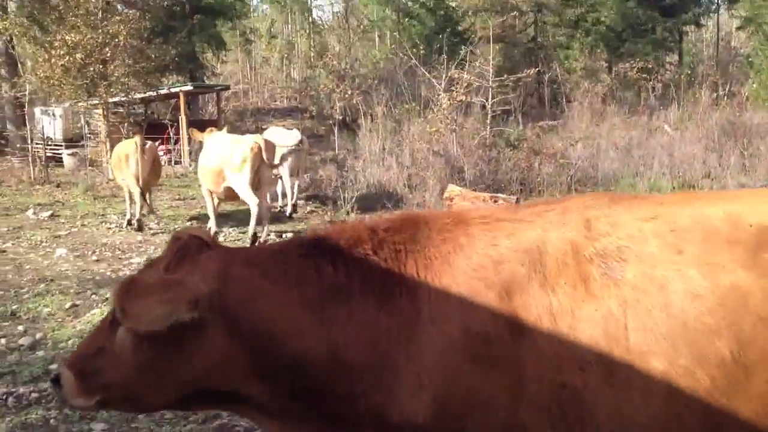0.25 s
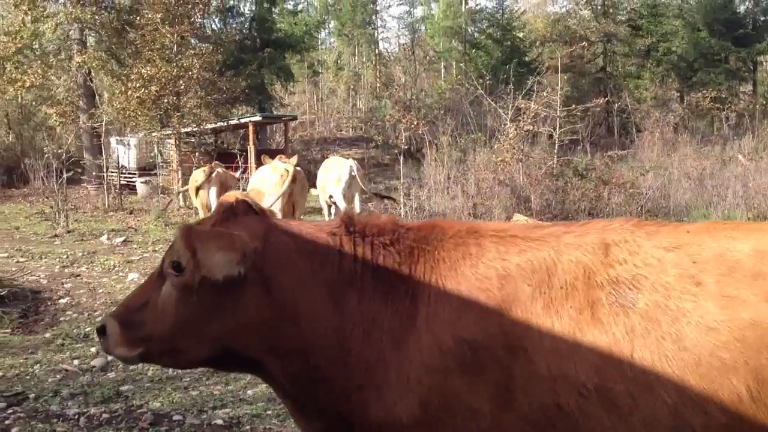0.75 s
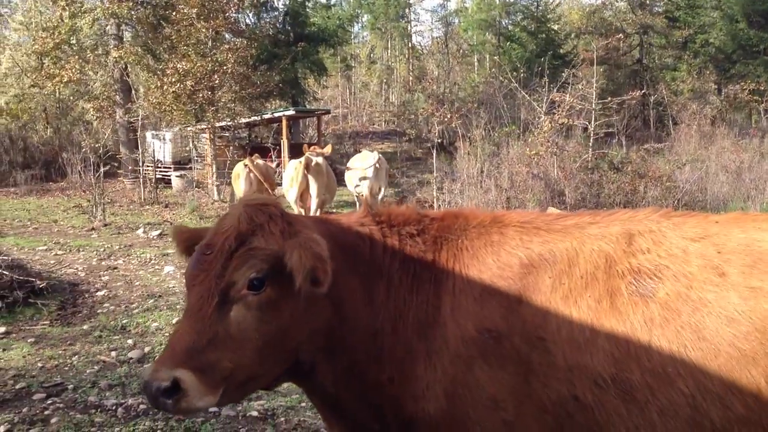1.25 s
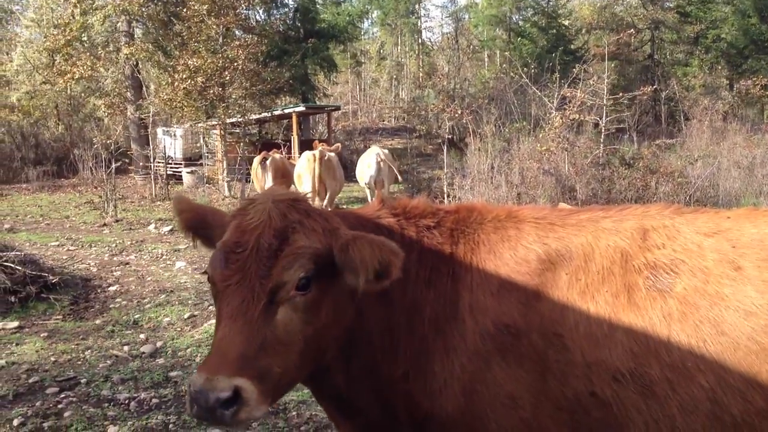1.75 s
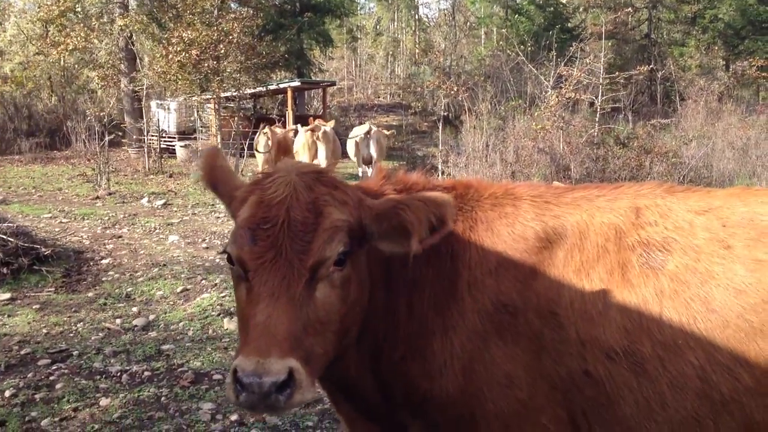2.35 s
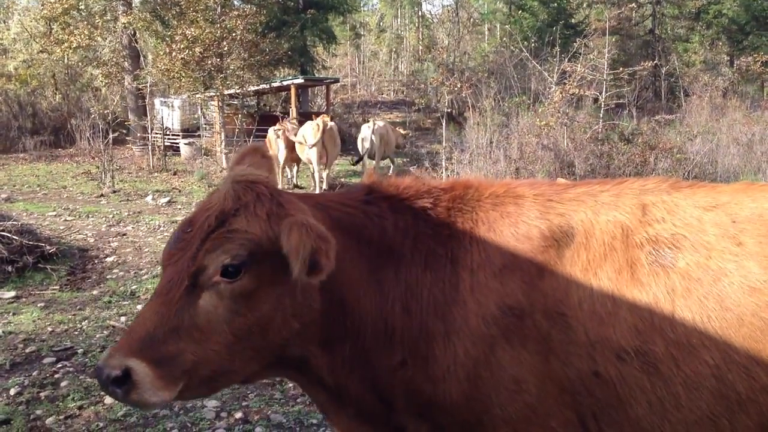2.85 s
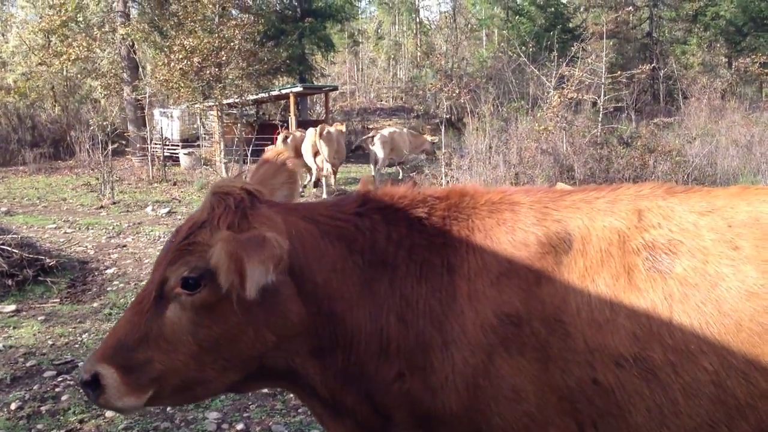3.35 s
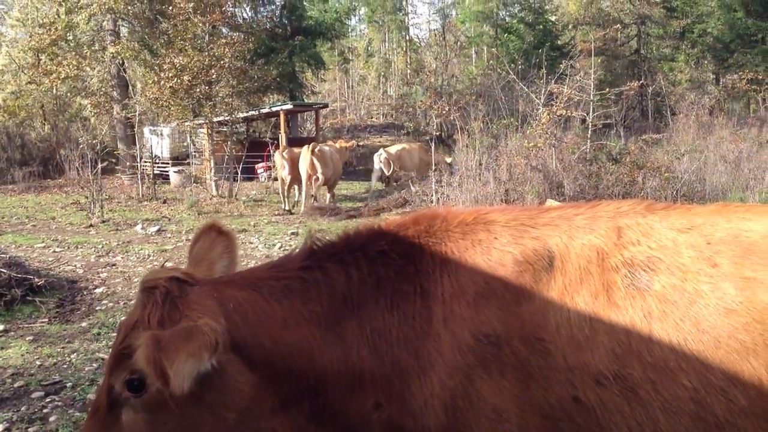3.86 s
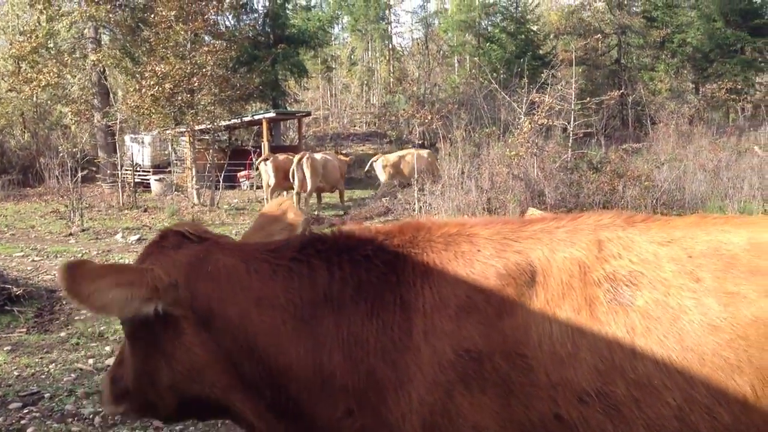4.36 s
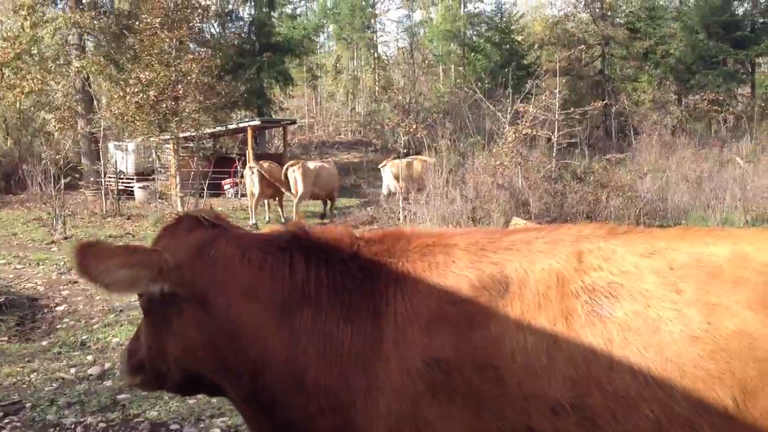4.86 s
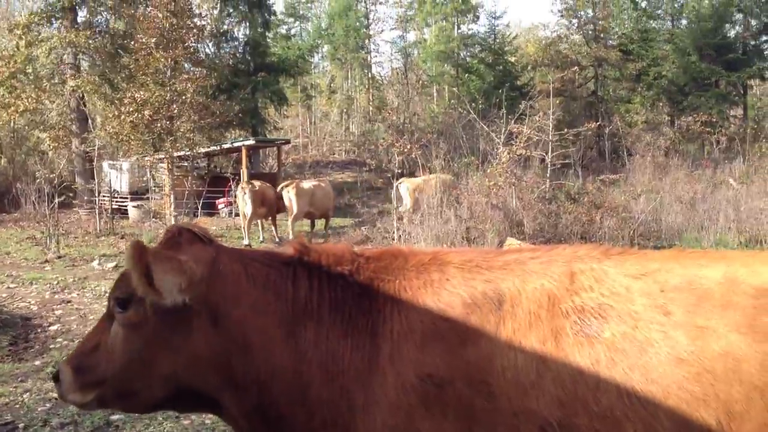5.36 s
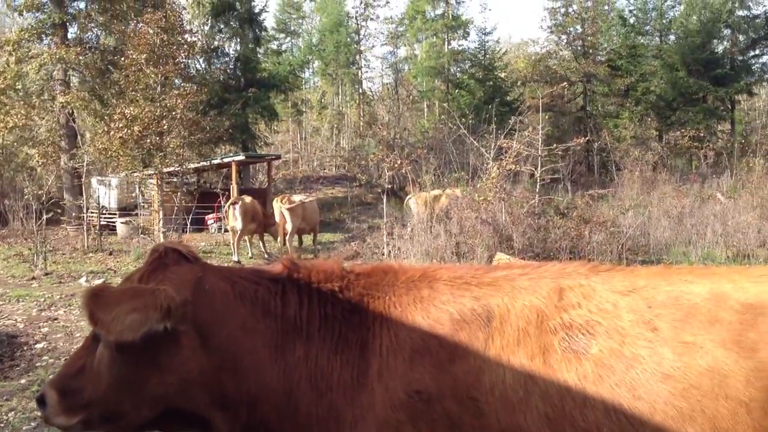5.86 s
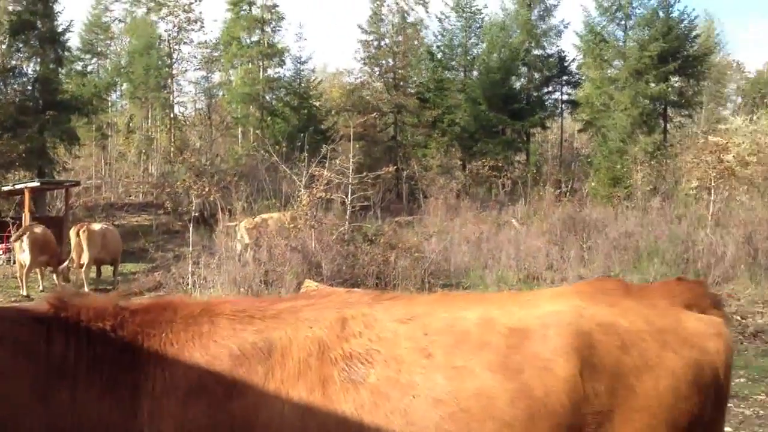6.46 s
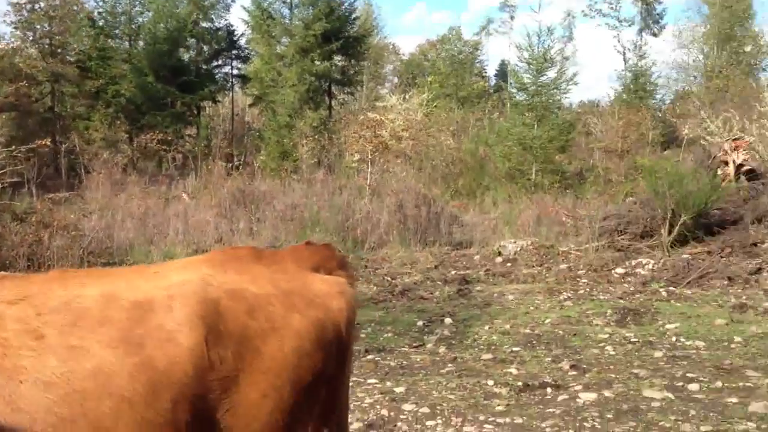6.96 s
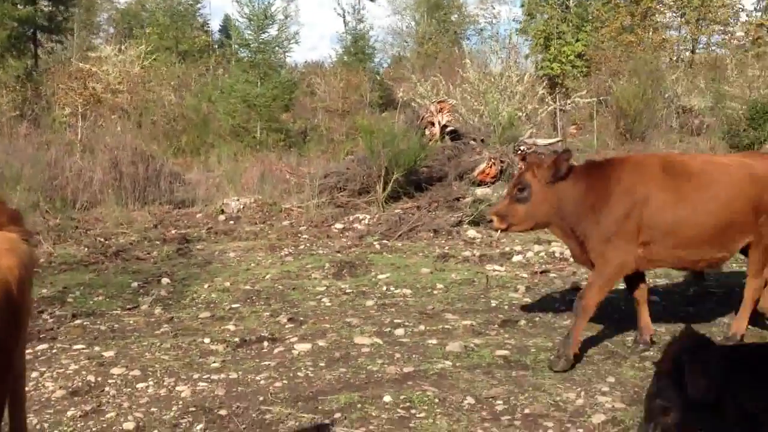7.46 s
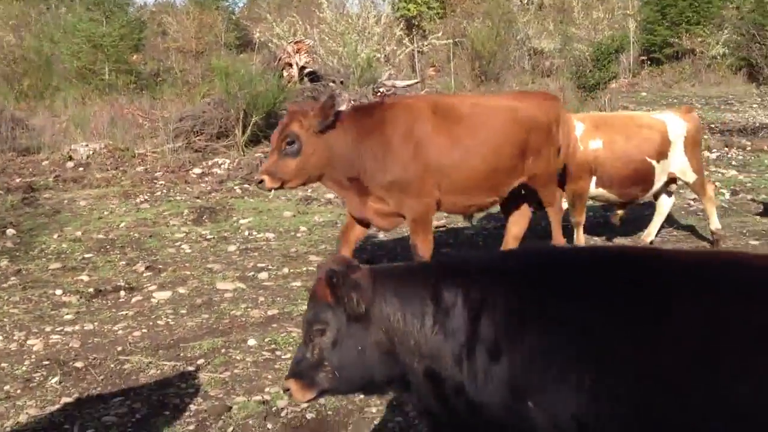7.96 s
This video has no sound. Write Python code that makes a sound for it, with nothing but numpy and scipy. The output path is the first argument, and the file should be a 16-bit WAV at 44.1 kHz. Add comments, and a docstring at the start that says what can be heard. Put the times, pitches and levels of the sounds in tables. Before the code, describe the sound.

A close, dry outdoor pasture with very quiet air. From 0 s, soft straw scuffs and small stalk snaps, a light hollow wood knock at 0.3, and short low fluttering grunts at about 0.1, 0.9, 1.4 and 1.9 s, each around a tenth of a second. At 2.0 s a loud hollow wooden bang with a sharp crack is the strongest event. From 2.5 to 4.3 s, crisp snaps and crunching straw crowd together, with weak knocks; a faint wavering hum sits behind from 2.1 to 3.8. Grunts return at 3.7 and 4.1, then 4.7, a stronger one at 4.85, and 5.1, 5.5, 6.0 and a faint 6.4. Clear wood knocks fall at 4.6 and 5.2. Hissing scuffs continue, with tiny thin pings between 5.6 and 6.9. The rustle turns duller near 7; a last low grunt comes at 7.3, then light snaps and scuffs until 8 s.

```python
"""Straw scuffs and a snapping stalk come first, then close pigs' short fluttering grunts as they root about.
Grunts: fold pulses chopped by a flapping palate, through chest, snout and nose resonances.
Straw: shaped noise and clumped cracks, with a gain curve per layer; snaps: short resonated noise bursts.
Hollow wood is knocked now and then: a blow and rattle excite decaying modes, a noisy tail fills in between.
Behind: quiet open air as shaped noise, and for a while a faint wavering sine hum."""
import sys
import numpy as np
from scipy import signal
from scipy.fft import rfft, irfft
from scipy.io import wavfile
from scipy.ndimage import uniform_filter1d

SR = 44100
rng = np.random.default_rng(int(sys.argv[2]) if len(sys.argv) > 2 else 0)


def generate_wav(sig):
    """Save sig (samples, or channels by samples) to the path in sys.argv[1] as 16-bit PCM at SR."""
    pcm = np.round(np.clip(np.atleast_2d(sig).T, -1, 1) * 32767).astype(np.int16)
    wavfile.write(sys.argv[1], SR, pcm)


N = 362061


def gain_of(db):
    """Decibels to gain."""
    return 10 ** (np.asarray(db) / 20)


def evened(x):
    """Scales to rms 1."""
    return x / np.sqrt(np.mean(x ** 2) + 1e-20)


def typical(x):
    """Scales so that the median short-time rms, between the cracks, is 1."""
    return x / np.sqrt(np.median(uniform_filter1d(x ** 2, size=200)))


def add(mix, start_s, sound):
    """Mixes a sound in at start_s."""
    part = mix[round(start_s * SR):][:len(sound)]
    part += sound[:len(part)]


def high_passed(x, order, cutoff_hz):
    """Butterworth high-pass."""
    return signal.sosfilt(signal.butter(order, cutoff_hz, "high", fs=SR, output="sos"), x)


def resonate(x, hz, width_hz):
    """Shifts hz down to zero, smooths, and shifts back: a resonance of gain 1."""
    turn = np.exp(2j * np.pi * np.cumsum(hz * np.ones(len(x))) / SR)
    r = np.exp(-np.pi * width_hz / SR)
    return 2 * (turn * signal.lfilter([1 - r], [1, -r], x / turn)).real


def resonate_twice(x, hz, width_hz):
    """Two resonances in series, the second twice as wide."""
    return resonate(resonate(x, hz, width_hz), hz, 2 * width_hz)


def coloured(x, points):
    """Filters x by the (hz, db) points, then scales to rms 1."""
    point_hz, point_db = np.transpose(points)
    hz = np.fft.rfftfreq(len(x), 1 / SR)
    db = np.interp(np.log(hz + 1), np.log(point_hz), point_db)
    return evened(irfft(rfft(x) * gain_of(db), len(x)))


def drift(per_s, size=N):
    """Slow random curve of rms 1."""
    hz = np.fft.rfftfreq(size, 1 / SR)
    spectrum = rfft(rng.standard_normal(size)) * (hz > 0) / (1 + (hz / per_s) ** 2)
    return evened(irfft(spectrum, size))


def curve(rows):
    """Joins the rows of a table over the whole time."""
    s, *columns = np.transpose(rows)
    return [np.interp(np.arange(N) / SR, s, c) for c in columns]


# air spectrum: freq_hz, relative_db
AIR_SPECTRUM = [(29, -41.5), (50, 9), (113, -13), (137, 3), (191, -6), (226, 0.5), (249, -16), (733, -23),
                (2010, -30), (10200, -26.5), (12700, -32), (15400, -28)]
AIR_LEVEL_DB = -61.5
# hum: time_s, pitch_hz, level_db
HUM_PATH = [(2.1, 226, -87), (2.4, 220.5, -60.5), (3.5, 224, -59.5), (3.8, 222, -78)]


def air():
    """Shaped noise for open air, plus a sine hum wavering in pitch."""
    hz, db = curve(HUM_PATH)
    hum = gain_of(db) * np.sin(2 * np.pi * np.cumsum(hz * (1 + 0.01 * drift(2.5))) / SR)
    noise = rng.standard_normal(N) * gain_of(0.64 * drift(6.4))
    return gain_of(AIR_LEVEL_DB) * coloured(noise, AIR_SPECTRUM) + hum


def crackle(per_s, spread_db, bed, clump_db):
    """Clumped tiny cracks of random size over a bed of rubbing noise."""
    size_db = spread_db * np.minimum(rng.exponential(1, N), 3.8)
    cracks = (rng.random(N) < per_s / SR) * gain_of(size_db)
    decay_s = 0.0022
    burst = signal.lfilter([1], [1, -np.exp(-1 / (decay_s * SR))], cracks)
    return rng.standard_normal(N) * (bed + evened(burst)) * gain_of(clump_db * drift(8.8))


# scuffs: peak_s, rise_s, fall_s (each per 20 dB), hiss_db, crunch_db, shove_db
SCUFF_EVENTS = [(.075, 0.4, 0.24, -50.5, -52.5, -70.5), (.334, 0.15, 0.222, -57, -76, -41),
                (.723, 0.23, 0.47, -57.5, -53.5, -49.5), (1.048, 0.26, 0.2, -57, -49.5, -46),
                (1.3, 0.098, 0.49, -64.5, -59.5, -74), (1.921, 0.15, 0.17, -54.5, -49.5, -44),
                (1.985, 0.016, 0.19, -46.5, -46, -28), (2.479, 0.0067, 0.053, -37, -42.5, -66),
                (2.588, 0.085, 0.26, -42, -38, -42.5), (2.908, 0.62, 0.12, -49, -47.5, -57),
                (3.039, 0.03, 0.18, -46, -41.5, -49), (3.352, 0.0147, 0.078, -42.5, -38.5, -52),
                (3.442, 0.0275, 0.41, -54, -48.5, -74), (3.707, 0.58, 0.16, -46, -50.5, -58),
                (3.811, 0.12, 0.21, -50.5, -44.5, -39), (4.025, 0.079, 0.15, -40, -46.5, -69),
                (4.216, 0.27, 0.25, -53.5, -45, -46.5), (4.291, 0.061, 0.57, -39, -40.5, -40),
                (4.854, 0.073, 0.071, -43, -49, -36), (5.044, 0.19, 0.11, -39, -44, -38.5),
                (5.248, 0.15, 0.29, -38, -47.5, -36.5), (5.483, 0.14, 0.21, -42, -57, -55.5),
                (5.637, 0.043, 0.36, -41.5, -43.5, -57), (5.867, 0.12, 0.119, -41.5, -39, -45.5),
                (5.96, 0.061, 0.057, -43.5, -45, -53.5), (6.11, 0.55, 0.073, -53, -47.5, -47.5),
                (6.306, 0.3, 0.23, -44, -44, -45), (6.51, 0.11, 0.116, -45, -48.5, -48.5),
                (6.715, 0.13, 0.11, -44.5, -52.5, -52), (7.119, 0.28, 1, -49.5, -49.5, -55.5),
                (7.418, 0.081, 0.146, -50, -49.5, -52), (7.518, 0.056, 0.069, -47, -49, -48.5),
                (7.712, 0.21, 0.14, -51, -51, -65.5), (7.827, 0.065, 0.083, -43, -43, -70),
                (7.988, 0.26, 0.43, -40, -42.5, -50.5)]
# rustle of the herd between scuffs: time_s, hiss_db, crunch_db, shove_db
RUSTLE_LEVELS = [(0, -78, -56.5, -49.5), (.6, -77, -59, -64.5), (1.2, -70, -69.5, -65),
                 (1.7, -73.5, -63, -63.5), (2.3, -79, -71.5, -58.5), (3.3, -70, -64, -68),
                 (4, -56, -72, -73), (5.2, -71, -52, -55), (6.6, -56, -55, -55), (7.3, -53, -59.5, -61),
                 (8.2, -63, -72, -53.5)]


def scuffing(column, lag_s=0, stretch=1):
    """Gain curve of one straw layer: background rustle plus a rise and fall per scuff, summed as power."""
    t = np.arange(N) / SR - lag_s
    power = gain_of(2 * curve(RUSTLE_LEVELS)[column])
    for peak_s, rise_s, fall_s, *levels_db in SCUFF_EVENTS:
        span_s = [peak_s - 2 * stretch * rise_s, peak_s + 2 * stretch * fall_s]
        near = slice(*np.searchsorted(t, span_s))
        slope = np.maximum((peak_s - t[near]) / rise_s, (t[near] - peak_s) / fall_s) / stretch
        power[near] += gain_of(2 * (levels_db[column] - 20 * slope))
    return np.sqrt(power)


# straw layer spectra: freq_hz, relative_db
HISS_SPECTRUM = [(2000, -44), (4500, -6), (5600, -1.5), (9000, -1), (13000, 2.2), (15400, 1),
                 (16500, -56.5)]
CRUNCH_SPECTRUM = [(300, -5.5), (600, 0.5), (1100, 3.5), (2200, 1), (4650, -0.5), (5200, -12.5),
                   (9000, -15)]
SHOVE_SPECTRUM = [(40, -48), (105, -12.5), (170, -1), (260, -0.6), (600, -7), (1200, -29.5), (2500, -76)]
DULLS_S, DULL_HZ = 6.75, 5070  # start of the fade to duller hiss; its low-pass cutoff
SHOVE_LAG_S = 0.011  # the body's push follows the feet
SHOVE_STRETCH = 0.89  # factor on rise and fall times; below 1 is quicker


def straw():
    """Dry stalks hiss and crunch; bodies and hooves push low noise through the ground litter."""
    fine = crackle(per_s=400, spread_db=4.2, bed=2.2, clump_db=1.5)
    coarse = crackle(per_s=260, spread_db=4.6, bed=1.2, clump_db=2.0)
    low = rng.standard_normal(N) * gain_of(3.0 * drift(17.5)) + .15 * coarse
    hiss = typical(coloured(fine + 0.081 * coarse, HISS_SPECTRUM))
    dull_hiss = signal.lfilter(*signal.butter(1, DULL_HZ, fs=SR), hiss)
    dull_share = np.clip((np.arange(N) / SR - DULLS_S) / 0.4, 0, 1)
    hiss = (1 - dull_share) * hiss + dull_share * dull_hiss
    crunch = coloured(coarse + 0.17 * fine, CRUNCH_SPECTRUM)
    shove = coloured(low, SHOVE_SPECTRUM)
    return (scuffing(column=0) * hiss
            + scuffing(column=1) * crunch
            + scuffing(column=2, lag_s=SHOVE_LAG_S, stretch=SHOVE_STRETCH) * shove)


# stalks, plus the two sharp attack clicks of the knock at 4.567 s: start_s, ring_peak_db, ring_hz,
# treble_over_ring_db
SNAP_EVENTS = [(0.0519, -27, 1590, -6.5), (0.1514, -34, 1610, 5), (0.2, -29.5, 1480, -19),
               (0.2847, -35.5, 1670, -19.5), (0.3255, -31, 1580, -12), (0.5126, -35.5, 2600, -13),
               (0.698, -33.5, 2430, -12), (1.487, -36, 846, -25), (1.9129, -32, 1110, -7),
               (1.9779, -12.5, 1670, -5), (1.983, -14, 400, -39), (2.4746, -20, 4720, 3),
               (2.5369, -26.5, 2780, -17), (2.5912, -23.5, 2030, -24), (2.6487, -28, 2520, -4),
               (2.678, -19, 1400, -9), (2.7796, -13, 990, -8), (2.8482, -24, 1180, -16),
               (2.8755, -28, 1180, -9), (2.93, -29, 1130, 2.5), (2.952, -38, 1200, -15),
               (3.028, -31.5, 990, -6), (3.0366, -18, 1970, -15), (3.042, -18, 2300, 1),
               (3.059, -25.5, 2100, -20.5), (3.0829, -28.5, 1920, 2), (3.1199, -33, 4000, 3),
               (3.1663, -38, 4000, 12), (3.218, -27, 4500, 6), (3.3505, -33, 2266, 8),
               (3.36, -27, 2400, -5.5), (3.4411, -22.5, 1200, -4), (3.593, -29, 896, -11),
               (3.6435, -28.5, 754, -19.5), (3.698, -27, 3600, -15), (3.709, -29.5, 3370, 11),
               (3.8034, -19.5, 1080, 5), (3.936, -32.5, 1000, -19.5), (4.1063, -21.5, 3900, -21.5),
               (4.211, -34, 1120, 19.5), (4.2841, -15.5, 3700, -1), (4.5668, -24, 3260, -40),
               (4.5695, -29, 2400, -40), (5.626, -28, 2385, 6.5), (7.11, -38.5, 1530, 12),
               (7.123, -28, 1300, -29), (7.5106, -30, 2130, -29), (7.7128, -26.5, 3050, -27),
               (7.8226, -28, 8000, -4), (7.9036, -29, 4250, -10), (8.003, -22.5, 4020, -8)]
# thin pings: start_s, level_db, pitch_hz, t60_s
PING_EVENTS = [(5.623, -43, 3866, 0.67), (5.645, -40, 4121, 0.25), (5.852, -44, 4346, 0.18),
               (5.954, -43, 3860, 0.28), (6.209, -37, 3642, 0.18), (6.272, -40, 8800, 0.152),
               (6.8, -48, 6120, 0.08), (6.21, -35, 10950, 0.064), (6.9, -44.5, 7300, 0.11)]


def snaps():
    """Each break, or sharp click of a knock, is a wide tick, a short ring and a puff of splinters; a few thin
    pings ring on."""
    out, t = np.zeros(N), np.arange(6000) / SR
    for start_s, db, hz, treble_db in SNAP_EVENTS:
        envelope = gain_of(-60 * t / 0.006) + 0.18 * gain_of(-60 * t / 0.056)  # break, splinters
        burst = rng.standard_normal(len(t)) * envelope
        ring = resonate(resonate(burst, hz, .9 * hz), hz, 2.5 * hz)
        tick = high_passed(burst, 2, 5000)
        add(out, start_s, gain_of(db) * (ring / abs(ring).max() + gain_of(treble_db) * tick / abs(tick).max()))
    for start_s, db, hz, t60_s in PING_EVENTS:
        tone = np.sin(2 * np.pi * np.cumsum(hz + 45 * drift(45, size=len(t))) / SR)
        flicker = gain_of(3.5 * drift(45, size=len(t)))
        attack = np.minimum(t / 0.0028, 1)
        add(out, start_s, gain_of(db - 60 * t / t60_s) * tone * flicker * attack)
    return out


# knocks: start_s, level_db, centre_hz, spread_octaves, t60_factor
KNOCK_EVENTS = [(0.265, -18.5, 390, 0.52, 0.74), (0.528, -29.5, 1040, 0.44, 0.54),
                (1.489, -31, 334, 1.1, 0.61), (1.909, -21, 313, 0.19, 1), (1.98, 2, 387, 1.09, 0.76),
                (2.777, -28, 576, 0.58, 0.59), (3.035, -29, 1030, 1.1, 0.54), (3.375, -25, 615, 0.296, 0.6),
                (3.428, -26, 810, 0.33, 0.18), (3.472, -24.5, 955, 0.64, 0.45),
                (3.801, -23.5, 804, 0.58, 1), (4.157, -23, 700, 0.76, 0.25),
                (4.567, -10.5, 1190, 0.95, 0.89), (5.217, -12.5, 476, 0.67, 0.84),
                (6.929, -30, 770, 0.65, 0.83), (7.643, -29, 446, 0.64, 0.51),
                (7.782, -30.5, 622, 0.32, 0.33)]
# wood modes: nominal_hz, relative_db, nominal_t60_s
WOOD_MODES = [(272.7, -2, 0.15), (348, 0, 0.33), (440.5, 5.5, 0.22), (574, -27, 0.12), (721, 7.5, 0.017),
              (878, -4, 0.197), (1001, 0, 0.1), (1570, 16.5, 0.011), (2100, 0, 0.12)]


def knocks():
    """A blow and its rattle ring the hollow wood; where it lands picks the modes."""
    out, t = np.zeros(N), np.arange(SR // 2) / SR
    for start_s, db, centre_hz, octaves, ring in KNOCK_EVENTS:
        rattle_fall = gain_of(-60 * t / 0.0068) + 0.041 * gain_of(-60 * t / (0.71 * ring))
        rattle = rng.standard_normal(len(t)) * rattle_fall
        rattle[0] = 4  # the blow itself
        body = np.zeros(len(t))
        for hz, mode_db, t60_s in WOOD_MODES:
            share = gain_of(mode_db - 4.8 * (np.log2(hz / centre_hz) / octaves) ** 2)
            tone = np.sin(2 * np.pi * hz * rng.uniform(0.92, 1.05) * t)
            mode = share * gain_of(-60 * t / (t60_s * ring)) * tone
            body += signal.fftconvolve(rattle, mode)[:len(t)]
        # a dense noisy tail of the hollow space fills in between the modes
        width_hz = octaves * centre_hz
        tail = rng.standard_normal(len(t)) * gain_of(2.2 * drift(59, size=len(t)))
        tail = resonate(resonate(tail, centre_hz, width_hz), centre_hz, 3 * width_hz)
        tail *= gain_of(-60 * t / (0.38 * ring)) + 0.27 * gain_of(-60 * t / 0.052)
        add(out, start_s, gain_of(db) * (0.43 * body / abs(body).max() + 0.37 * tail / abs(tail).max()))
    return out


# snout resonances: nominal_hz, width_hz, relative_db
SNOUT_MODES = [(1850, 113, 2.5), (2740, 470, -2), (3270, 180, 0), (4710, 140, -6), (5800, 200, -15)]
# nose resonances: nominal_hz, width_hz, relative_db
NOSE_MODES = [(596, 126, 3), (1100, 96, 2)]
PITCH_START = .82  # starting pitch, as a share of the pitch at the loudest moment
SNOUT_SAG, NOSE_FOLLOW = 0.061, 0.25  # share the snout resonances sink; power of pitch the nose follows
PAIRED_HZ = 240  # top pitch above which closings alternate firm and weak
OPEN_SHARE = 0.611  # rasp length over the rest of the grunt
RASP_HZ, RASP_KNEE_DB, RASP_OCTAVES_PER_DB = 1990, -41.5, 1.3  # a rasp above the knee is brighter


def grunt(length_s, loudest, chest_db, top_hz, flaps_per_s, depth, opens_s, rasp_db, mouth, nose_db,
          end_db, end_pitch, upper):
    """Uneven fold pulses, chopped by the flapping palate, boom in the chest and rasp in the snout."""
    t = np.arange(0, length_s, 1 / SR)
    size = len(t)
    depth = np.clip(depth, 0, 1)
    flap_cycle = np.cos(2 * np.pi * (flaps_per_s * t - .25))
    flap = 1 - depth + depth * np.exp(2.0 * (flap_cycle - 1))
    moments = [0, np.clip(loudest, .05, .95), 1]
    arch = np.interp(t / length_s, moments, [PITCH_START, 1, end_pitch])
    turns = np.cumsum(top_hz * arch * (1 + 0.06196 * drift(40, size=size))) / SR
    effort = gain_of(np.interp(t / length_s, moments, [0.7 * end_db, 0, end_db]))

    paired = top_hz > PAIRED_HZ
    pulses = evened(np.diff(np.floor(turns), prepend=0) * gain_of(3 * drift(64, size=size)))
    closings = np.where(np.floor(turns) % 2 * paired, .2, 1) * pulses
    puffs = evened(np.exp(-(turns % 1) / 0.91) * rng.standard_normal(size))  # air leaks in every cycle

    throat = evened(resonate(resonate(pulses + 0.56 * puffs, 268.0, 166.0), 260.0, 240.0))
    boom = np.sin(2 * np.pi * turns) + .3 * paired * np.sin(np.pi * turns)
    boom = boom * gain_of(1.5 * drift(35, size=size))
    chest = evened(effort * flap * (boom + 0.3 * throat))

    rasp_s = OPEN_SHARE * (length_s - opens_s)
    along = (t - opens_s) / rasp_s
    voiced = np.sqrt(flap) * (evened(closings) + .55 * puffs) * np.clip(10 * along, 0, 1)
    drive = voiced * np.interp(along, [.7, 1, 1.3], [1, .2, 0])
    centre_hz = RASP_HZ * 2 ** (RASP_OCTAVES_PER_DB * max(rasp_db - RASP_KNEE_DB, 0))
    # the rasp darkens as the snout closes
    bright_hz = np.minimum(centre_hz * 2 ** (.4 - 1.1 * np.clip(along, 0, 1)), 3300)
    snout = mouth * (1 + SNOUT_SAG * (.5 - t / length_s))
    rasp = np.zeros(size)
    for (hz, width_hz, db), factor in zip(SNOUT_MODES, [snout, upper * snout, upper * snout, 1, 1]):
        tilt_db = -15.0 * np.minimum(np.log2(hz / bright_hz), .85) ** 2
        flicker_db = 1.0 * drift(29, size=size)  # each resonance's level wavers at random
        mode = resonate_twice(drive, hz * factor, width_hz) / np.sqrt(width_hz)
        rasp += gain_of(db + tilt_db + flicker_db) * mode

    nostrils = arch ** NOSE_FOLLOW
    nose = sum(gain_of(db) * resonate_twice(voiced, hz * nostrils, width_hz)
               for hz, width_hz, db in NOSE_MODES)
    open_snout = gain_of(rasp_db) * evened(rasp) + gain_of(nose_db) * evened(nose)
    open_snout = open_snout * np.sqrt(min(rasp_s / length_s, 1))
    return (gain_of(chest_db) * chest + open_snout) * signal.windows.tukey(size, .1)


# grunts: start_s, length_s, loudest_share, chest_db, top_pitch_hz, palate_flaps_per_s, flutter_depth_share,
#         snout_opens_s (after start), rasp_db, mouth_tract_factor, nose_db, end_db, end_pitch_share,
#         upper_snout_factor
GRUNT_EVENTS = [(0.144, 0.12, 0.62, -39.5, 190.4, 36.52, 0.9, 0.023, -52, 1.05, -50, -11, 0.85, 0.8),
                (0.944, 0.12, 0.62, -40, 170, 40, 0.82, 0.025, -39.5, 0.98, -45.5, -15, 0.71, 0.985),
                (1.387, 0.088, 0.33, -37, 268.6, 41, 0.4, 0.0064, -42.5, 0.955, -50.5, -1, 0.38, 1.14),
                (1.883, 0.08, 0.76, -37.5, 198.2, 41, 0.84, 0.027, -50.5, 0.986, -58, -15, 1, 0.81),
                (3.685, 0.11, 0.66, -38.5, 168.3, 40, 0.63, 0.017, -41, 1.016, -39.5, -8, 1.2, 1.005),
                (4.124, 0.11, 0.55, -42, 171, 40, 0.68, 0.002, -61, 1.04, -41, 0, 0.85, 1),
                (4.706, 0.077, 0.34, -45.5, 190, 30, 0.42, 0.014, -59, 0.93, -56.5, -2, 0.793, 1.2),
                (4.851, 0.13, 0.29, -27, 181.6, 37, 0.94, .002, -54, 0.48, -62, -22, 1.02, 0.88),
                (5.144, 0.15, 0.62, -35, 216.5, 34.7, 0.74, 0.0257, -68.5, 0.72, -48, -14, .88, 1.1),
                (5.527, 0.078, 0.5, -38.5, 180.6, 32.3, 0.73, 0.014, -46.5, 0.79, -44.5, -1, 0.843, 1.3),
                (5.973, 0.083, 0.6, -43.5, 217, 31, 0.6, 0.0045, -54, 0.96, -56, -16, 0.79, 0.95),
                (6.395, 0.088, 0.15, -45, 218, 28, 0.6, .004, -72, 0.85, -67, -5, 1.05, 1),
                (7.336, 0.14, 0.51, -41.5, 152.5, 39.6, 0.84, 0.023, -55.5, 0.887, -56, -12, 0.95, 0.74)]


def grunts():
    """All grunts, with a short decaying-noise tail from ground and fence."""
    pigs, t = np.zeros(N), np.arange(8000) / SR
    for start_s, *settings in GRUNT_EVENTS:
        add(pigs, start_s, grunt(*settings))
    tail = rng.standard_normal(len(t)) * (t > .008) * gain_of(-60 * t / 0.23)
    return pigs + gain_of(-9.5) * signal.fftconvolve(pigs, tail / np.linalg.norm(tail))[:N]


def scene():
    """Sums all sources; grunts and knocks are high-passed to keep the deep bass thin."""
    thinned = high_passed(grunts() + knocks(), 2, 85)
    return (thinned + straw() + snaps() + air())[None]


def record(dry):
    """The microphone drops the deep bass; then the band limit."""
    thin = high_passed(dry, 4, 100)
    band_limit = signal.firwin(511, 15500, window=("kaiser", 9), fs=SR)
    return signal.oaconvolve(thin, band_limit[None], "same")


dry = scene()
out = record(dry)
generate_wav(out)
```